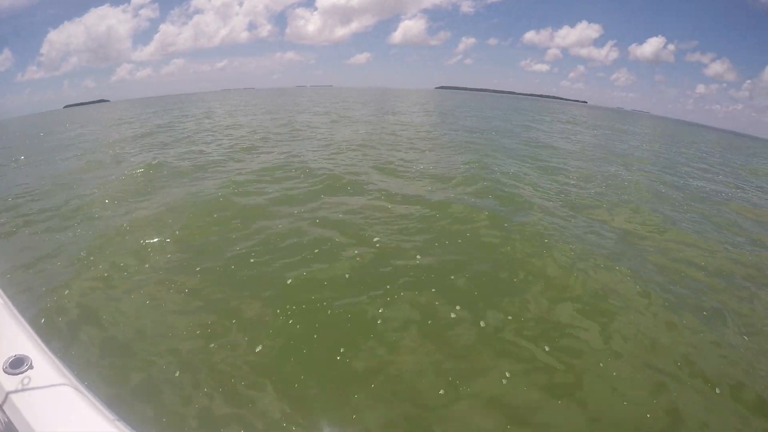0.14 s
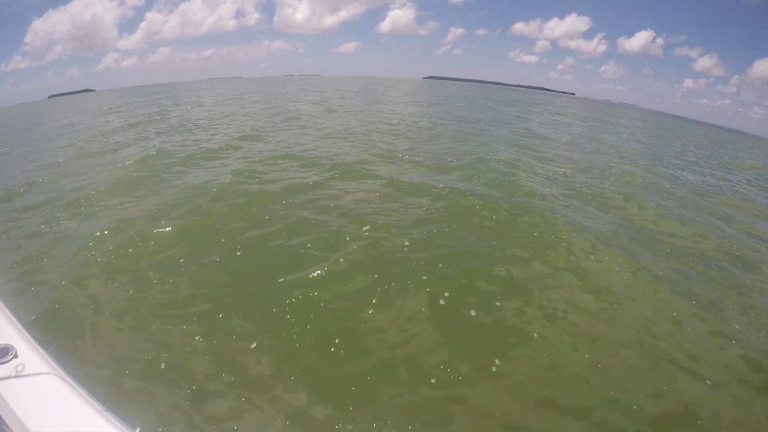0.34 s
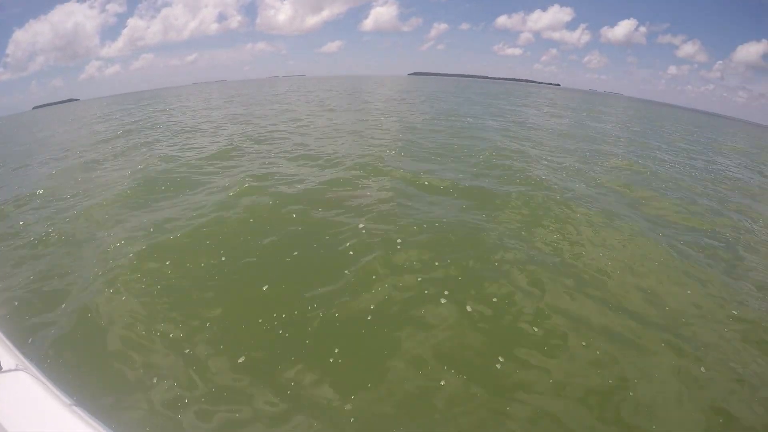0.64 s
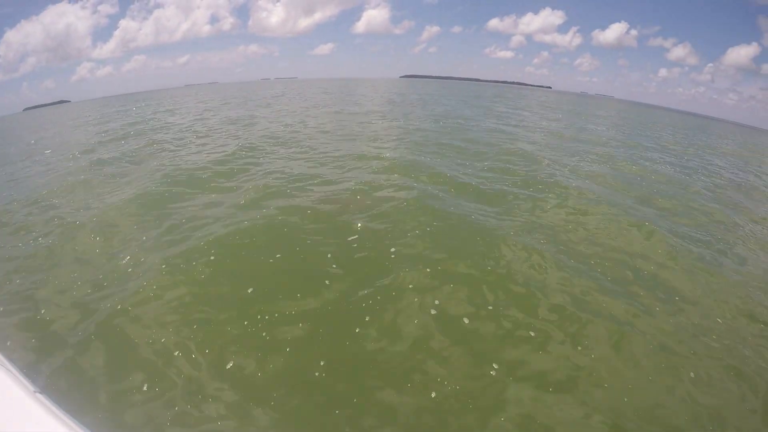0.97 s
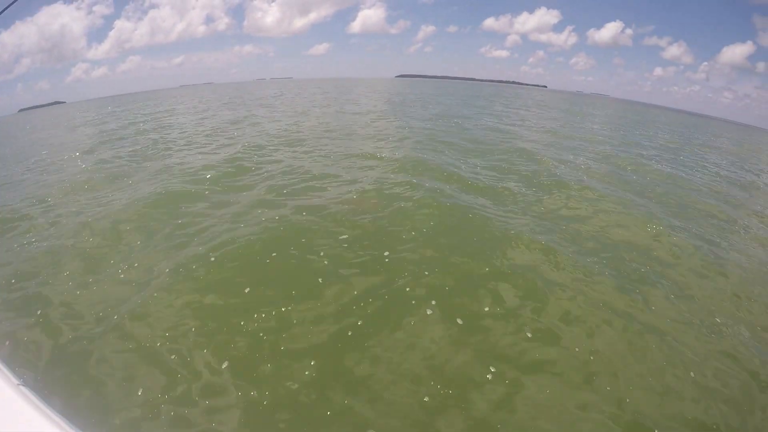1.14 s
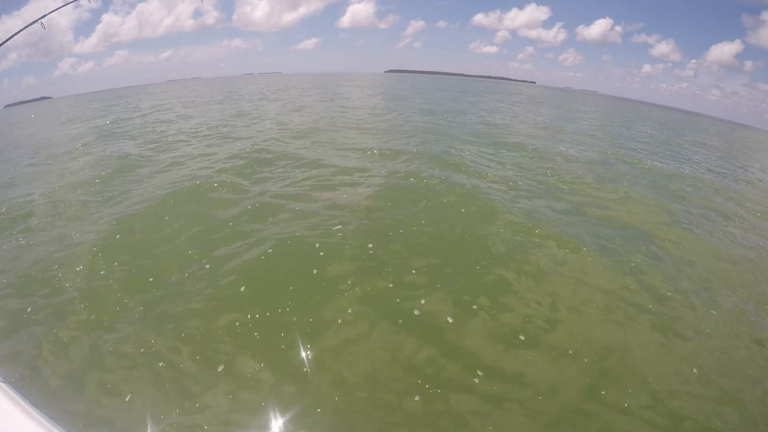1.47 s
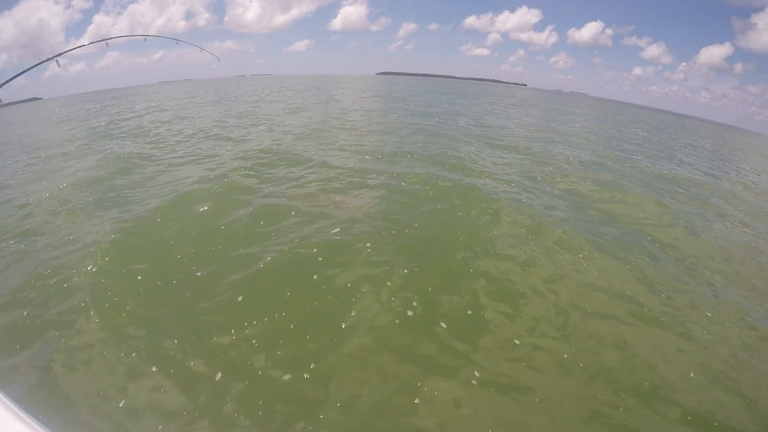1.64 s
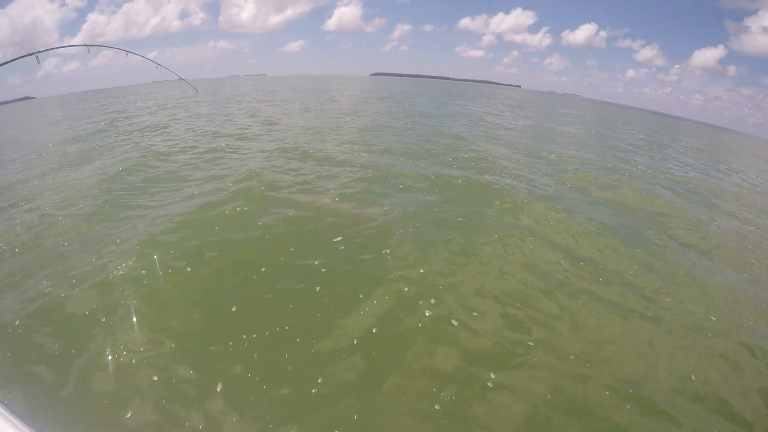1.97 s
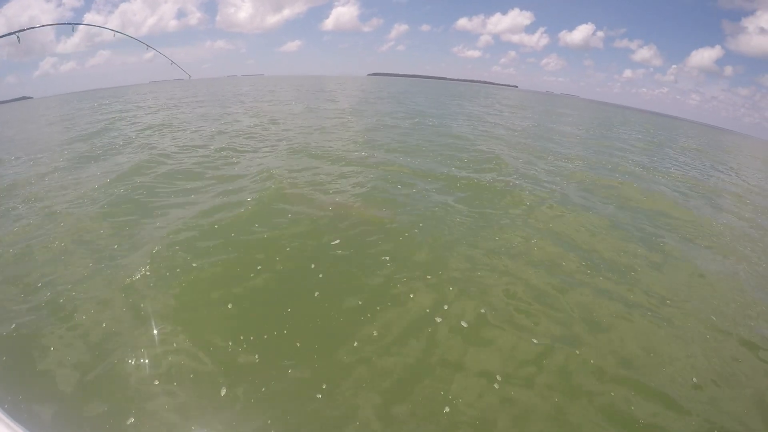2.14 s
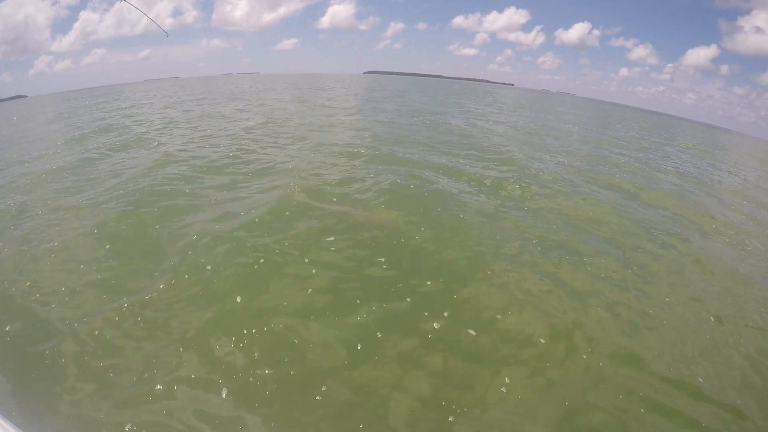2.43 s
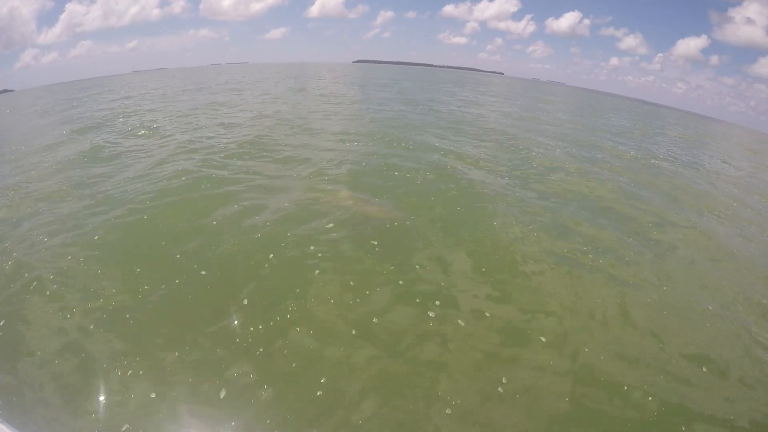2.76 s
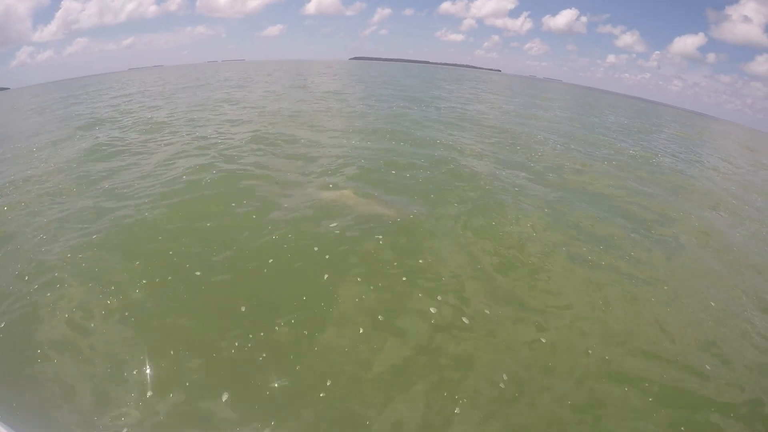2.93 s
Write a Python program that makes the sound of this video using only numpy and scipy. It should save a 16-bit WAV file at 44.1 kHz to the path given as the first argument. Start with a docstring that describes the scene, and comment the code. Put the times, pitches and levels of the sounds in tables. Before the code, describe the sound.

Small waves lap and slap a boat hull with hollow, bubbly glugs: quiet at first, clearer near 1 s and 1.7 s, busiest at 2.3-2.5 s. Deep wind buffets thud on the exposed microphone, strongest around 1.9-2 s and 2.4 s. A faint, wavering motor whine fades late. After a lone tick at 0.1 s, a reel ratchet clicks rapidly from about 2.05 s, slowing toward 2.84 s; a dull hull knock lands at 2.8 s.

```python
"""Beside a boat on calm water: small waves lap and slap at the hull, trapped air glugs, one knock sounds.
Laps and slaps are crowds of short rings, glugs are swelling tones, the knock is damped hull modes.
Gusts buffet the microphone as shaped noise, pressure dips and one grainy thump; an electric motor whines
faintly as a wavering sine. In the second half a small metal ratchet, likely a fishing reel's drag, ticks
faster and then slows, after a lone early click: each click is ringing modes and a noise scrape."""
import sys
import numpy as np
from scipy import signal
from scipy.fft import rfft, irfft
from scipy.io import wavfile

SR = 44100
rng = np.random.default_rng(int(sys.argv[2]) if len(sys.argv) > 2 else 0)


def unload_audio(sound):
    """Save the sound as a 16-bit wav file, at the path given as the first command line argument."""
    columns = np.transpose(np.atleast_2d(sound))
    # keep every value between -1 and 1, then stretch to whole-number steps
    steps = np.round(np.clip(columns, -1, 1) * 32767)
    wavfile.write(sys.argv[1], SR, steps.astype(np.int16))


N = 136710

# Wavelets slapping the hull, and at 1.983 s the low thump of a wind buffet.
# Each row: start in seconds, level in dB, decay in seconds, tilt in dB per octave.
SLAPS_AND_THUMP = [(.165, -50, 0.005, 12), (0.344, -49.5, 0.05, 3.5), (0.397, -46, 0.046, -2.5),
                   (0.868, -47.5, 0.066, -0.5), (0.948, -39, 0.03, -1.5), (1.04, -42.5, 0.038, 1.5),
                   (1.049, -47, 0.01, 6), (1.528, -51.5, 0.059, 8.5), (1.658, -51, 0.0083, 9),
                   (1.707, -41, 0.021, -3.5), (1.846, -48.5, 0.076, 6.5), (1.983, -27.5, 0.025, -7.5),
                   (2.02, -46.5, 0.009, 12), (2.337, -34, 0.021, 2.5), (2.379, -35.5, 0.028, -3),
                   (2.424, -32, 0.015, -16), (2.458, -37.5, 0.0027, 7.5), (2.486, -45.5, 0.078, -5)]
# Colour of a slap or thump before tilt. Each row: frequency in Hz, relative level in dB.
SLAP_SPECTRUM = [(60, -12), (200, -2.5), (400, -3), (600, 7), (980, -0.5), (1300, -12.5), (2100, -21),
                 (3500, -38), (15000, -77)]
SLAP_RISE_S = 0.00038
SLAP_GRAINS_PER_S, SLAP_DECAY_CYCLES, SLAP_SPREAD_DB = 2500, 5, 3

# Air pockets ringing at the hull. Each row: start in seconds, settled mean pitch in Hz,
# level in dB before GLUG_GAIN_DB, decay in seconds.
GLUGS = [(0.278, 365, -43.5, 0.025), (0.396, 372, -35, 0.011), (.884, 369, -40, 0.01),
         (.948, 728, -23.5, 0.0049), (.970, 1014, -37, 0.0048), (1.046, 837, -31, 0.006),
         (1.043, 1590, -46, 0.015), (1.065, 793, -34.5, 0.02), (1.22, 1593, -46, 0.013),
         (1.548, 1597, -46.5, 0.022), (1.663, 219.4, -31.5, 0.037), (1.69, 857, -40, 0.043),
         (1.722, 1640, -45, 0.009), (1.742, 413, -32, 0.0047), (1.836, 182, -37, 0.018),
         (1.938, 659, -32.5, .015), (2.026, 726, -39, 0.0089), (2.274, 611, -37.5, 0.0084),
         (2.303, 635, -39, 0.019), (2.337, 1341, -27.5, 0.0044), (2.337, 2850, -50.5, 0.0068),
         (2.338, 784, -25.5, 0.01), (2.359, 860, -31, 0.0093), (2.378, 586, -28.5, 0.0081),
         (2.422, 273, -27.5, 0.0063), (2.458, 438, -32.5, 0.0058), (2.512, 367, -31, .019),
         (2.534, 753, -43.5, 0.0083), (2.922, 345, -31, 0.015), (2.959, 686, -41.5, 0.013)]
GLUG_RISE_S, GLUG_BEND_HZ, GLUG_SETTLE_S, GLUG_GAIN_DB = 0.0028, 46.3, 0.012, 3
GLUG_ROUGHNESS, GLUG_PITCH_JITTER = 0.3, 0.012  # RMS fractions

# Small ripples along the hull. Each row: time in seconds, level in dB.
LAPPING = [(0, -57), (.25, -54), (.42, -57.5), (.76, -58.5), (.97, -49), (1.14, -54), (1.23, -47),
           (1.44, -57.5), (1.57, -52), (1.73, -43), (1.8, -55), (2.15, -54.5), (2.4, -51), (2.55, -54.5),
           (2.68, -63), (2.95, -59), (3.1, -72.5)]
# Colour of the ripples. Each row: frequency in Hz, relative level in dB.
RIPPLE_SPECTRUM = [(100, -33), (300, -6), (480, -5.5), (630, 0), (830, 8), (1050, -8.5), (1300, -12.5),
                   (1680, -8), (2100, -14.5), (3000, -28), (6000, -28)]
RIPPLE_BUBBLES_PER_S, RIPPLE_DECAY_CYCLES, RIPPLE_SPREAD_DB = 3500, 14.5, 5

# Modes of the hull. Each row: frequency in Hz, level in dB, decay in seconds.
HULL_MODES = [(316, -36, 0.0113), (673, -33, 0.0033), (926, -29.5, 0.0019), (1680, -42, 0.002)]
KNOCK_S = 2.78

# Ratchet clicks. Each row: start in seconds, level in dB before CLICK_GAIN_DB,
# spool ring in dB relative to the click, before SPOOL_GAIN_DB.
CLICKS = [(0.101, -53.5, -13), (1.786, -48.5, -4), (1.81, -56, -21), (2.046, -61.5, 10), (2.079, -53.5, 5),
          (2.106, -57, -3), (2.129, -61, -6), (2.151, -55, 4), (2.174, -56.5, -21), (2.2013, -55, 3),
          (2.2286, -52.5, -14), (2.252, -48, -12), (2.275, -47, -10), (2.2994, -48.5, -11),
          (2.329, -55, -10), (2.3566, -54.5, -12), (2.391, -57, -11), (2.441, -52.5, -12),
          (2.4895, -49.5, -10), (2.562, -51.5, 2.5), (2.6312, -51, 4), (2.7096, -49, 2),
          (2.8387, -49, -2.5)]
# Modes of the pawl. Each row: nominal frequency in Hz, mean relative level in dB, decay in seconds.
PAWL_MODES = [(4840, -5, 0.0028), (5460, -3.5, 0.0046), (5900, -2, 0.0024), (8450, -14, 0.0025),
              (10140, -16.5, 0.0024), (10450, -9.5, 0.0023), (12400, -25, .003)]
PAWL_SPREAD_DB, CLICK_GAIN_DB = 3.5, -2.5
SPOOL_HZ, SPOOL_DECAY_S, SPOOL_GAIN_DB = 5765, 0.024, -7.5
SCRAPE_LEVEL, SCRAPE_DECAY_S = 0.29, 0.0065

# Gusts on the microphone. Each row: start in seconds, time until the fall in seconds,
# deep rumble in dB before DEEP_GAIN_DB, upper rumble in dB before UPPER_GAIN_DB.
GUSTS = [(0.021, 0.11, -44, -51.5), (0.352, 0.21, -37.5, -56), (0.996, 0.21, -33, -50.5),
         (1.294, 0.032, -33, -52), (1.702, 0.037, -26.5, -28.5), (1.75, 0.28, -22.5, -37),
         (2.014, 0.22, -34, -53.5), (2.235, 0.11, -30, -44), (2.357, 0.093, -22, -31),
         (2.452, .15, -27, -38), (2.617, 0.053, -29.5, -67), (2.757, 0.064, -39, -41.5),
         (2.864, 0.067, -29, -44.5)]
# Strong buffets of air. Each row: centre in seconds, level in dB, half width in seconds.
BUFFETS = [(1.178, -18, 0.0085), (1.879, -13.5, 0.0056), (1.934, -16.5, 0.009), (1.988, -9, 0.0032),
           (2.264, -20, 0.0037), (2.427, -12.5, 0.01)]
# Colours of the two rumbles. Each row: frequency in Hz, relative level in dB.
DEEP_SPECTRUM = [(8, -20), (24, -5), (40, -4.5), (58, -12), (80, -21), (130, -54.5), (400, -100)]
UPPER_SPECTRUM = [(40, -81.5), (80, 7), (125, 0.5), (165, -9), (240, -20.5), (400, -25), (1500, -65)]
DEEP_GAIN_DB, UPPER_GAIN_DB = 0, 1.5
GUST_RISE_S, GUST_FALL_S, CALM_DEEP_DB, CALM_UPPER_DB = 0.015, 0.025, -44.5, -59

# Motor whine. Each row: time in seconds, mean pitch in Hz, RMS level in dB before flutter.
MOTOR = [(0, 1868, -61.5), (.45, 1890, -62.5), (1.13, 1884, -62), (1.2, 1860, -65.5), (1.62, 1875, -66),
         (1.92, 1906, -63.5), (1.99, 1887, -65.5), (2.06, 1902, -61), (2.15, 1870, -68),
         (2.22, 1904, -61.5), (2.5, 1878, -70.5), (3.1, 1874, -73.5)]
# Thin whistles that come and go. Each row: mean pitch in Hz, peak RMS level in dB,
# loudest time in seconds, half length in seconds.
WHISTLES = [(3710, -75.5, 1.28, 0.4), (10480, -85.5, 1.6, 1.5), (3175, -79.5, 2.604, 0.44)]
WAVER, WAVER_HZ = 0.00358, 21.3  # RMS fraction of the pitch, bandwidth
WHINE_FLUTTER = 0.17  # RMS fraction of the amplitude

# Steady wash and hiss. Each row: frequency in Hz, relative level in dB.
AIR_SPECTRUM = [(88, -51), (150, 1.5), (380, -2), (808, -2.5), (1360, -14.5), (1750, -13), (2010, -16.5),
                (2580, -16.5), (9430, -26), (15300, -31.5)]
AIR_DB = -58
CUT_HZ = 15350


def slaps_and_thump():
    """Each slap or thump is a short grainy burst, coloured by the hull."""
    out, t = np.zeros(N), np.arange(SR // 4) / SR
    grains = bubbles(SLAP_GRAINS_PER_S, SLAP_DECAY_CYCLES, SLAP_SPREAD_DB)
    for start_s, db, decay_s, tilt_db in SLAPS_AND_THUMP:
        even_grains = steadied(colour(grains, SLAP_SPECTRUM, tilt_db), 0.051)
        burst = even_grains[round(start_s * SR):][:len(t)]
        envelope = (1 - np.exp(-t / SLAP_RISE_S)) * np.exp(-t / decay_s)
        add(out, start_s, amp(db) * burst * envelope)
    return out


def glugs():
    """Each trapped pocket of air swells, rings unevenly and sags in pitch."""
    out, t = np.zeros(N), np.arange(SR // 4) / SR
    for start_s, hz, db, decay_s in GLUGS:
        jitter = 1 + GLUG_PITCH_JITTER * drift(90)[:len(t)]
        pitch_hz = hz * jitter + GLUG_BEND_HZ * np.exp(-t / GLUG_SETTLE_S)
        roughness = 1 + GLUG_ROUGHNESS * drift(200)[:len(t)]
        envelope = (1 - np.exp(-t / GLUG_RISE_S)) * np.exp(-t / decay_s) * roughness
        tone = np.sin(2 * np.pi * np.cumsum(pitch_hz) / SR)
        add(out, start_s, amp(db + GLUG_GAIN_DB) * envelope * tone)
    return out


def ripples():
    """Fine bubbling along the hull swells and sinks with the lapping."""
    crowd = bubbles(RIPPLE_BUBBLES_PER_S, RIPPLE_DECAY_CYCLES, RIPPLE_SPREAD_DB)
    return steadied(colour(crowd, RIPPLE_SPECTRUM), 0.81) * amp(curve(LAPPING))


def knock():
    """A single sharp blow rings the damped modes of the hull."""
    out, t = np.zeros(N), np.arange(SR // 10) / SR
    ring = np.zeros(len(t))
    for hz, db, decay_s in HULL_MODES:
        ring += amp(db) * np.exp(-t / decay_s) * np.sin(2 * np.pi * hz * t)
    add(out, KNOCK_S, (1 - np.exp(-t / SLAP_RISE_S)) * ring)
    return out


def ratchet():
    """The pawl snaps over a tooth and scrapes; some clicks leave the spool ringing."""
    out, t = np.zeros(N), np.arange(SR // 5) / SR
    for start_s, db, ring_db in CLICKS:
        snap = np.zeros(len(t))
        for hz, mode_db, decay_s in PAWL_MODES:
            level = amp(mode_db + PAWL_SPREAD_DB * rng.standard_normal())
            turns = hz * rng.uniform(0.97, 1.01) * t + rng.random()
            snap += level * np.exp(-t / decay_s) * np.sin(2 * np.pi * turns)
        scrape = SCRAPE_LEVEL * rng.standard_normal(len(t)) * np.exp(-t / SCRAPE_DECAY_S)
        spool = np.exp(-t / SPOOL_DECAY_S) * np.sin(2 * np.pi * SPOOL_HZ * t)
        ring = amp(ring_db + SPOOL_GAIN_DB) * spool
        add(out, start_s, amp(db + CLICK_GAIN_DB) * (snap + scrape + ring))
    return out


def wind():
    """Each gust swells two bands of rumble, holds and dies; the strongest buffets are dips of pressure."""
    t = np.arange(N) / SR
    deep_power, upper_power = amp(CALM_DEEP_DB) ** 2, amp(CALM_UPPER_DB) ** 2
    for start_s, length_s, deep_db, upper_db in GUSTS:
        rise = np.sin(np.pi / 2 * np.clip((t - start_s) / GUST_RISE_S, 0, 1)) ** 2
        fall = np.exp(-np.maximum(t - start_s - length_s, 0) / GUST_FALL_S)
        swell = rise * fall
        deep_power = deep_power + (amp(deep_db + DEEP_GAIN_DB) * swell) ** 2
        upper_power = upper_power + (amp(upper_db + UPPER_GAIN_DB) * swell) ** 2
    out = np.sqrt(deep_power) * rumble(DEEP_SPECTRUM, 0.17)
    out += np.sqrt(upper_power) * rumble(UPPER_SPECTRUM, 0.019)
    for centre_s, db, half_width_s in BUFFETS:
        u = (t - centre_s) / half_width_s
        out += amp(db) * (u ** 2 - 1) * np.exp(-u ** 2 / 2)  # a dip with raised shoulders
    return out


def motor():
    """A sine whine wavers in pitch and level, with thin whistles that come and go."""
    t = np.arange(N) / SR
    pitch_hz = curve(MOTOR, axis=1) * (1 + WAVER * drift(WAVER_HZ))
    level = amp(curve(MOTOR, axis=2)) * (1 + WHINE_FLUTTER * drift(30))
    out = level * np.sin(2 * np.pi * np.cumsum(pitch_hz) / SR)
    for hz, db, peak_s, half_s in WHISTLES:
        swell = 1 / (1 + ((t - peak_s) / half_s) ** 4)
        turns = np.cumsum(hz + 9 * drift(30)) / SR
        out += amp(db) * swell * np.sin(2 * np.pi * turns)
    return np.sqrt(2) * out  # RMS to peak


def air():
    """Steady wash and hiss: noise of fixed colour and level."""
    return amp(AIR_DB) * colour(rng.standard_normal(N), AIR_SPECTRUM)


def bubbles(per_s, decay_cycles, spread_db, count=56):
    """A crowd of tiny bubble-like grains of many sizes, each ringing briefly and rising in pitch."""
    out, t = np.zeros(N), np.arange(SR // 10) / SR
    for hz in np.geomspace(200, 6000, count) * rng.uniform(0.97, 1.02, count):
        struck = rng.random(N) < per_s / count / SR
        hits = struck * amp(spread_db * np.minimum(rng.exponential(1, N), 3))
        age = t * hz / decay_cycles
        envelope = (1 - np.exp(-4 * age)) * np.exp(-age)
        grain = hz * envelope * np.sin(2 * np.pi * hz * t * (1 + 1.657 * t))
        out += signal.oaconvolve(hits, grain)[:N]
    return out


def rumble(spectrum, span_s):
    """Low turbulent noise of even strength."""
    return steadied(colour(rng.standard_normal(N), spectrum), span_s)


def colour(x, points, tilt_db=0):
    """Gives x a spectrum, tilted per octave, at unit RMS."""
    octave = np.log2(np.fft.rfftfreq(len(x), 1 / SR) + 1)
    hz, db = np.transpose(points)
    gain_db = np.interp(octave, np.log2(hz), db) + tilt_db * octave
    return unit(irfft(rfft(x) * amp(gain_db), len(x)))


def steadied(x, span_s):
    """Evens out the chance swells of a noise by dividing by its local RMS."""
    window = np.hanning(int(span_s * SR) + 3)
    power = abs(signal.fftconvolve(x ** 2, window / window.sum(), "same"))
    return x / np.sqrt(power + 1e-4)


def drift(rate_hz):
    """Slow random motion at unit RMS."""
    hz = np.fft.rfftfreq(N, 1 / SR)
    return unit(irfft(rfft(rng.standard_normal(N)) * np.exp(-(hz / rate_hz) ** 2), N))


def curve(rows, axis=1):
    """One column of a time table, interpolated for every sample."""
    rows = np.array(rows)
    return np.interp(np.arange(N) / SR, rows[:, 0], rows[:, axis])


def add(mix, start_s, sound):
    """Adds a sound to the mix in place, cut off at the end."""
    part = mix[max(round(start_s * SR), 0):][:len(sound)]
    part += sound[:len(part)]


def amp(db):
    """Decibels to amplitude."""
    return 10 ** (np.asarray(db) / 20)


def unit(x):
    """Scales x to unit RMS."""
    return x / np.sqrt(np.mean(x ** 2) + 1e-20)


def scene():
    """Sums all sources into one channel."""
    hull = slaps_and_thump() + glugs() + ripples() + knock()
    return (hull + ratchet() + wind() + motor() + air())[None]


def record(dry):
    """Limits the band with a linear-phase low-pass filter."""
    lowpass = signal.firwin(511, CUT_HZ, window=("kaiser", 9), fs=SR)
    return signal.oaconvolve(dry, lowpass[None], "same")


dry = scene()
out = record(dry)
unload_audio(out)
```